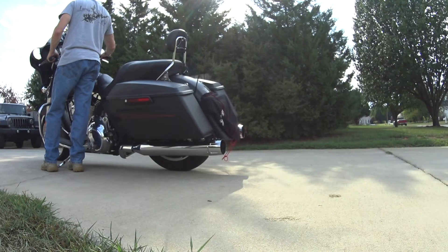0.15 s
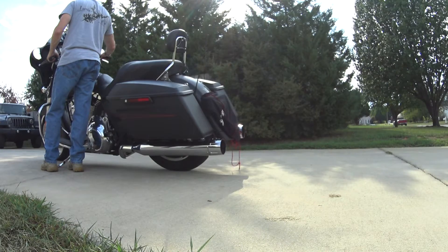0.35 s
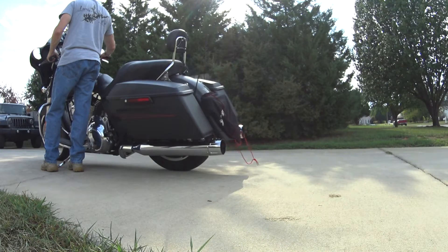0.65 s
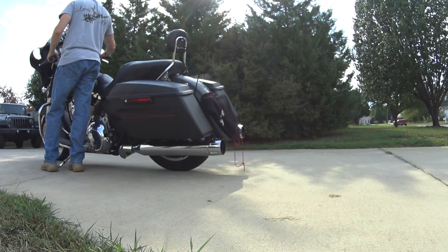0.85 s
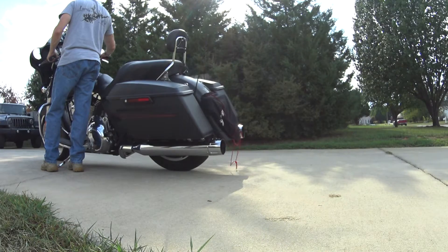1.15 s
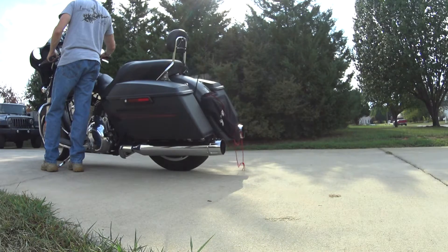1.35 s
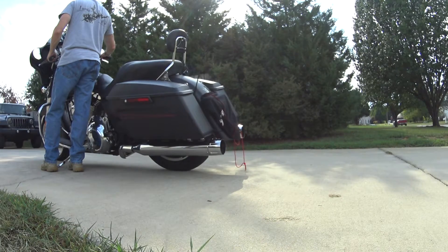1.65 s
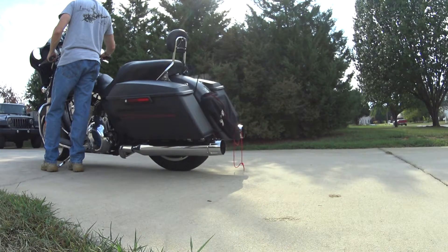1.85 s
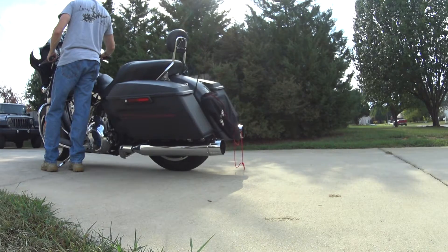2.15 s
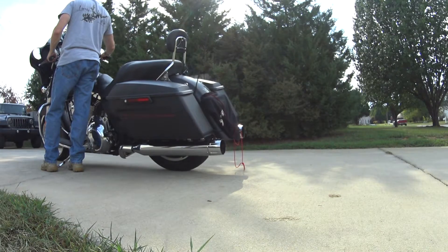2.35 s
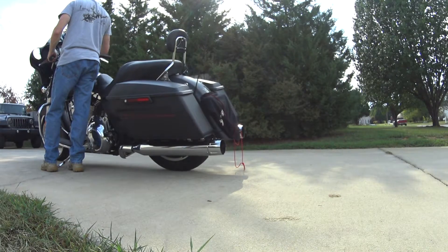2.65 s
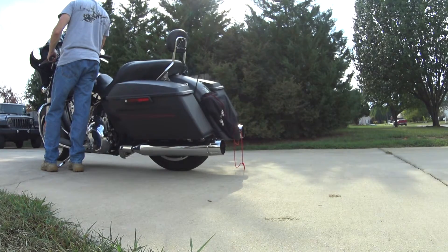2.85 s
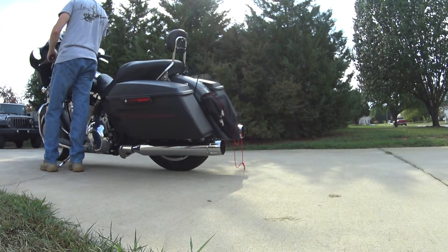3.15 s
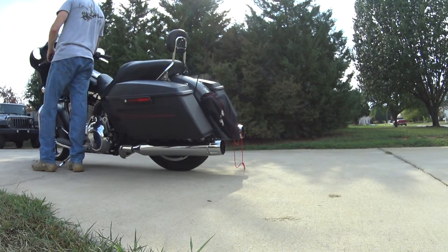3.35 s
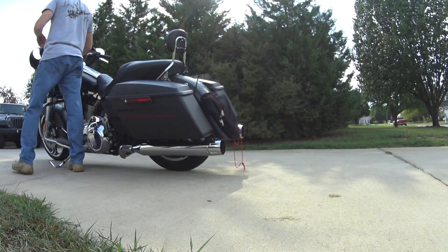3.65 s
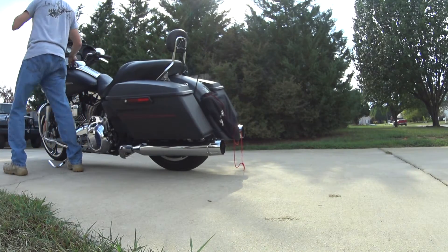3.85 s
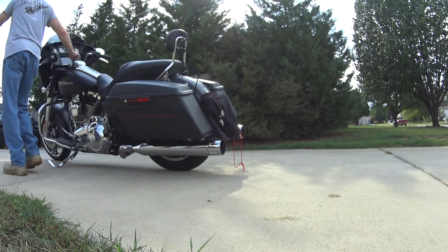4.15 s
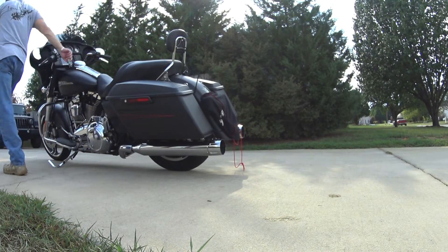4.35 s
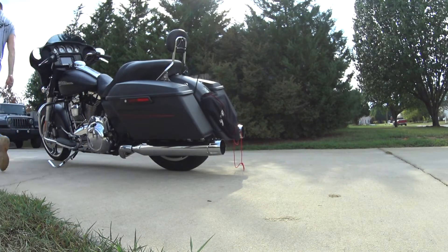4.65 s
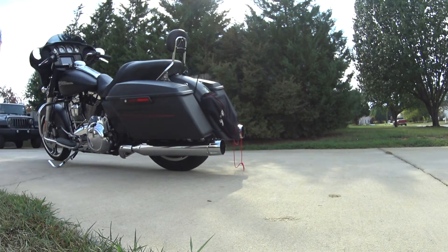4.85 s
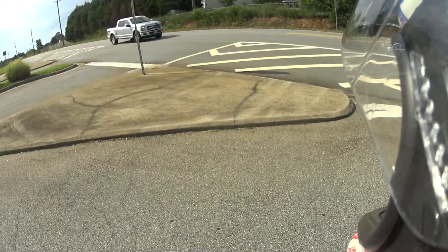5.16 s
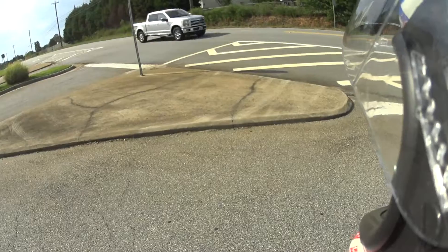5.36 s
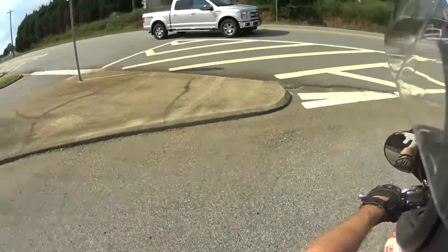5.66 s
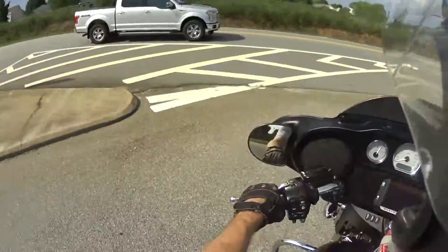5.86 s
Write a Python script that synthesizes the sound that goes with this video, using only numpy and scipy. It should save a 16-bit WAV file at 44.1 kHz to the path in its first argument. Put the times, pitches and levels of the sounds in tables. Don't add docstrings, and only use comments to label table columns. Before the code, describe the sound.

Uneven, loping motorcycle idle with clattering metal stops; faint scuffs and thuds follow in a hushed yard before a cut to close, heavy riding engine thump.

```python
import sys
import numpy as np
from scipy import signal
from scipy.fft import rfft, irfft
from scipy.io import wavfile
from scipy.ndimage import uniform_filter1d

SR = 44100
rng = np.random.default_rng(int(sys.argv[2]) if len(sys.argv) > 2 else 0)


def pcm_store(signal):
    levels = np.round(np.clip(np.atleast_2d(signal), -1, 1) * 32767)
    wavfile.write(sys.argv[1], SR, levels.astype(np.int16).T)


def to_linear_factor(level_db):
    exponent = np.asarray(level_db, float) / 20
    return 10 ** exponent


N = 265482
BRIEF_T = np.arange(4400) / SR
CUT_S, BACK_S = 5.315, 5.3575
KEY_OFF_S = 3.66
REAR_LAG = 315 / 720
FULL_DB, LEAN_DB = -10, -21.5


def evened(x):
    return x / np.sqrt(np.mean(x ** 2) + 1e-20)


def read(points, hz, column=1):
    table = np.transpose(points)
    return np.interp(np.log(hz + 1), np.log(table[0] + 1), table[column])


def add(mix, s, sound):
    part = mix[round(s * SR):][:len(sound)]
    part += sound[:len(part)]


def smooth_noise(size):
    return evened(uniform_filter1d(rng.standard_normal(N), size=size))


def noise(spectrum, span, size=512, patchy_db=4.0):
    hz = np.fft.rfftfreq(size, 1 / SR)
    length = round((span[1] - span[0]) * SR)
    real, imaginary, patches = rng.standard_normal((4 * length // size + 6, len(hz), 3)).T
    patches = uniform_filter1d(patches, size=size // 100, axis=0)
    patches = evened(uniform_filter1d(patches, size=4096 // size, axis=1))
    bins = (real + 1j * imaginary) * to_linear_factor(read(spectrum, hz)[:, None] + patchy_db * patches)
    wave = signal.istft(bins, nperseg=size, noverlap=3 * size // 4)[1]
    out = np.zeros(N)
    add(out, span[0], evened(wave[:length]))
    return out


def mode(hz, db, t60):
    return to_linear_factor(db - 60 * BRIEF_T / t60) * np.sin(2 * np.pi * hz * BRIEF_T)


def ports(shared, twin, table):
    hz = np.fft.rfftfreq(N, 1 / SR)
    tilt = to_linear_factor(read(table, hz) / 2) * np.exp(.5j * read(table, hz, column=2))
    like = np.clip(read(table, hz, column=3), 0, 1)
    left, other = rfft(shared), rfft(twin)
    right = like * left + np.sqrt(1 - like ** 2) * other
    return np.array([irfft(left * tilt, N), irfft(right / tilt, N)])


# frequency_hz, level_db
YARD_SPECTRUM = [(25, -26), (60, -14), (125, 1), (190, -7), (350, -10.5), (520, -11.5), (750, -19),
                 (1150, -16), (1900, -21), (2800, -22), (8600, -28.5), (11200, -26.5), (14000, -55)]
# frequency_hz, left_minus_right_db, left_lead_rad, likeness
YARD_PORTS = [(70, -5.5, .02, .96), (150, -2.5, -0.42, 1), (330, -1.5, -0.76, 0.83), (900, -1, -0.51, 0.19),
              (5500, -1, 0.12, 0.95), (9000, 2.1, -0.36, 0.6)]


def yard(steps):
    span, level = (0, BACK_S), to_linear_factor(-59.5)
    near = level * noise(YARD_SPECTRUM, span, size=2048, patchy_db=1.1)
    far = level * noise(YARD_SPECTRUM, span, size=2048, patchy_db=-1.0)
    return ports(near + steps, far + np.roll(steps, 6), YARD_PORTS)


def strokes(charges, law, snap_db=0):
    knock_db, knock_slope, jet_db, jet_slope, least_db, heat, cooling = law
    s, charge_db = np.transpose(charges)
    jet = np.maximum(jet_db + jet_slope * (charge_db - FULL_DB), least_db) + snap_db
    knock = knock_db + knock_slope * (charge_db - FULL_DB) + snap_db
    warmth = heat - cooling * np.maximum(LEAN_DB - charge_db, 0)
    return np.transpose([s, charge_db, knock, jet, warmth])


def rear_times(front_s, end_s):
    return front_s + REAR_LAG * np.diff(np.append(front_s, end_s))


def ring(pipe, heat):
    (open_hz, shut_hz, middle_s, rise_s, shut_s), orders = pipe
    t = BRIEF_T
    rise = .5 + .5 * np.tanh((t - middle_s) / rise_s)
    hz = heat * (open_hz + (shut_hz - open_hz) * rise)
    turn = 2 * np.pi * np.cumsum(hz) / SR + np.pi
    wave = 0
    for order, (first_db, last_db) in enumerate(orders, 1):
        wave = wave + to_linear_factor(first_db + (last_db - first_db) * t / shut_s) * np.cos(order * turn)
    return wave * np.clip(t / .005, 0, 1) * to_linear_factor(-1300 * np.maximum(t - shut_s, 0))


def exhaust(cylinders, muffler, knock_db, jet_db, chuff_s):
    pipes, jet, chuff = np.zeros(N), np.zeros(N), np.zeros(N)
    t = BRIEF_T
    knock = np.exp(-((t - .0006) / 0.00026) ** 2) - 0.2 * np.exp(-((t - .0014) / 0.00048) ** 2)
    spit = np.exp(-((t - .0045) / 0.003) ** 2) + 0.43 * (t > .005) * np.exp(-t / 0.019)
    swell = t / chuff_s * np.exp(1 - t / chuff_s)
    for events, pipe in cylinders:
        for s, ring_db, valve_db, crack_db, heat in events:
            shell = sum(mode(hz * rng.uniform(0.87, 1.04), db + 2 * rng.normal(), t60) for hz, db, t60 in muffler)
            add(pipes, s, to_linear_factor(ring_db) * ring(pipe, heat))
            add(pipes, s - .0006, to_linear_factor(valve_db + knock_db) * (knock + shell))
            add(jet, s, to_linear_factor(crack_db + jet_db) * spit)
            add(chuff, s, to_linear_factor(ring_db) * swell)
    return pipes, jet, chuff


# pitch_hz, level_db, t60_s
FIN_MODES = [(4350, -5, .015), (4830, -4, .02), (5320, -3.5, .02), (5700, -2, .02), (6610, -5, .015),
             (8350, -9, .012)]


def fins(shake, ticks_per_s):
    which = rng.integers(0, len(FIN_MODES), N)
    ticks = to_linear_factor(1.3 * np.minimum(rng.exponential(1, N), 4)) * (rng.random(N) < ticks_per_s / SR)
    struck = np.zeros(N)
    for k, fin in enumerate(FIN_MODES):
        struck += signal.oaconvolve(shake * ticks * (which == k), mode(*fin))[:N]
    return evened(struck)


# frequency_hz, level_db
JET_SPECTRUM = [(700, -9.5), (1600, 9), (2700, -8), (4500, 1.5), (5500, 2), (7200, -3), (8600, -4),
                (11000, -5)]
# frequency_hz, level_db
BOOM_SPECTRUM = [(30, -38), (55, 2.5), (90, -3), (150, -5), (210, -10.5), (280, -40), (400, -51)]


def engine(cylinders, muffler, body, layers, rumble, clatter, mics,
           knock_db, jet_db, pump, chuff_s, fins_db, lumpy_db, patchy_db):
    pipes, jet, pumping = exhaust(cylinders, muffler, knock_db, jet_db, chuff_s)
    s, shake_db = np.transpose(body)
    span, t = (s[0], s[-1]), np.arange(N) / SR
    boom, low, high = (to_linear_factor(np.interp(t, s, db + slope * shake_db, -120, -120)) for db, slope in layers)
    boom = boom / (1 + 12 * uniform_filter1d(abs(pipes), size=600))
    if s[0] < KEY_OFF_S:
        boom = boom * to_linear_factor(-55 * np.clip(t - KEY_OFF_S, 0, 1))
    low = low * (1 + pump * pumping) * to_linear_factor(lumpy_db * smooth_noise(700))
    jet = jet * to_linear_factor(2.1 * smooth_noise(50))
    shake = high + .1 * jet
    metal = to_linear_factor(fins_db) * fins(shake, 1500) * np.sqrt(np.mean(shake ** 2))

    def turbulence():
        rumbling = low * noise(rumble, span, size=1024, patchy_db=patchy_db)
        clattering = high * noise(clatter, span)
        return rumbling + clattering + jet * noise(JET_SPECTRUM, span, patchy_db=1.3)

    near, far = turbulence(), turbulence()
    direct = pipes + metal + boom * noise(BOOM_SPECTRUM, span, size=2048, patchy_db=3.5)
    return ports(direct + near, np.roll(direct, 260) + far, mics)


# front_start_s, front_charge_db, rear_charge_db, snap_db; lean charges misfire
IDLE = [(0.1038, -27.5, -21.5, -8), (0.2088, -13.5, -12.5, .5), (0.3226, -31, -31, 3),
        (.4197, -10.5, -32.5, -2), (.533, -53, -12.5, 5.5), (.649, -10, -23.5, -1.5),
        (0.7609, -12, -18.5, -0.5), (0.8765, -11.5, -14.5, -1), (0.9893, -16.5, -45, -0.5),
        (1.1098, -12, -11.5, 0.5), (1.2246, -9.5, -47, -0.5), (1.3382, -16.5, -16, 0.5),
        (1.4634, -10.5, -19, 1.5), (1.5835, -11.5, -17, -2), (1.7042, -10, -21.5, 2),
        (1.825, -11, -13.5, 4.5), (1.9405, -8.5, -25.5, -1.5), (2.0561, -10, -15.5, 0),
        (2.1759, -9.5, -14, 2.5), (2.2934, -9, -25.5, 1), (2.4135, -9.5, -11, 2), (2.5296, -8, -40.5, 0),
        (2.6456, -10.5, -13, -3), (2.7678, -9.5, -15.5, 0), (2.8856, -8.5, -12.5, -1),
        (3.0034, -9, -23, -1), (3.1234, -10, -10.5, 2.5), (3.2422, -9, -17, -2), (3.3603, -9, -10, 2),
        (3.4761, -9.5, -18, 0.5)]
# start_s, charge_db
IDLE_FIRST_REAR = (0.027, -19)
# start_s, charge_db
RUNDOWN = [
    (3.605, -15),
    (3.666, -19),
    (3.7085, -31),
    (3.7587, -18.5),
    (3.8437, -22.5),
    (3.903, -35),
    (4.002, -22.5),
    (4.333, -44.5),
]
# knock_at_full_db, knock_db_per_db, jet_at_full_db, jet_db_per_db, least_jet_db,
# heat_factor, heat_lost_per_lean_db
FRONT_LAW = (-22.5, 1.4, -29.5, 1.5, -50, 0.99, 0.04)
REAR_LAW = (-25.5, 0.2, -28.5, 1.6, -51.5, 0.97, -0.05)
COLD_LAW = (-21.5, 1, -27, 1.4, -70, 1.32, 0.2)
# opening_db, closing_db
FRONT_PIPE = (57.7, 72.2, 0.015, 0.0043, 0.04), [(-20, -20), (0.55, -3.5), (-25, -33.5), (-23.5, -25)]
REAR_PIPE = (59, 98.1, 0.025, 0.0068, 0.046), [(-19.5, -15), (0.2, -5.5), (-13.5, -18), (-22, -22)]
COLD_PIPE = (59.7, 63.3, 0.018, .005, 0.043), [(1, -22), (3, -24), (-25, -25), (-31, -31)]


def idling():
    s, front_db, rear_db, snap_db = np.transpose(IDLE)
    front = strokes([*zip(s, front_db)], FRONT_LAW, snap_db)
    rear_charges = [IDLE_FIRST_REAR, *zip(rear_times(s, RUNDOWN[0][0]), rear_db)]
    rear = strokes(rear_charges, REAR_LAW, 0.53 * np.append(0, snap_db))
    return [(front, FRONT_PIPE), (rear, REAR_PIPE), (strokes(RUNDOWN, COLD_LAW), COLD_PIPE)]


# pitch_hz, level_db, t60_s
MUFFLER = [(390, -15, 0.036), (716, -16.5, 0.047), (786, -13.5, 0.011), (1147, -17.5, 0.075),
           (1600, -29, 0.022)]
# time_s, level_db
BODY = [(0, -1.5), (.17, -2.5), (.3, -4.5), (1.0, -3.5), (1.2, -3), (1.75, -2.5), (1.95, -1.5), (2.65, 0),
        (3.1, -0.5), (3.45, 1), (3.61, -1.5), (3.89, -4.5), (4.02, -6), (4.11, -11), (4.2, -18.5),
        (4.42, -23.5), (4.6, -39)]
# level_at_zero_shake_db, db_per_db_of_shake
BODY_LAYERS = [
    (-23.5, 1.6),
    (-32, 1.05),
    (-38.5, 1.33),
]
# frequency_hz, level_db
RUMBLE = [(140, -26), (230, 5), (317, -10), (377, 0.5), (612, -6), (766, -8), (1520, -18), (2100, -22),
          (2690, -28.5), (3000, -35), (3900, -42), (6600, -120)]
CLATTER = [(880, 16), (1500, -15), (2100, 2), (2700, 2.5), (3170, 6.5), (4630, -1), (5670, 5), (10200, 1),
           (11200, -12), (14600, -49), (22000, -120)]
# frequency_hz, left_minus_right_db, left_lead_rad, likeness
DRIVE_PORTS = [(60, -4.7, -1.06, 1), (152, -6, -0.67, 1), (340, -6.5, -1.15, 0.99), (900, -4, -0.88, 0.99),
               (2500, -1, -0.38, 0.77), (5500, -0.6, -0.36, 0.91), (9000, 1.1, 0.18, 0.83)]


def parked_engine():
    return engine(idling(), MUFFLER, BODY, BODY_LAYERS, RUMBLE, CLATTER, DRIVE_PORTS,
                  knock_db=9.5, jet_db=2.0, pump=3.46, chuff_s=0.012, fins_db=-9.5, lumpy_db=1.62, patchy_db=2.0)


# start_s, level_db, pitch_hz
PINGS = [(.588, -25, 5440), (1.163, -20, 5320), (1.17, -25, 5550), (2.233, -28.5, 5370), (2.47, -47, 5330),
         (3.178, -21.5, 5410), (3.187, -23, 5570), (3.416, -32, 5260), (.16, -29, 8740)]


def cylinder_pings():
    out, soft = np.zeros(N), np.minimum(np.arange(4400) / 120, 1)
    for s, db, hz in PINGS:
        add(out, s, to_linear_factor(db) * soft * (mode(hz, 0, .035) + mode(hz * 1.05, -8, .02)))
    return out


# start_s, level_db, centre_hz, length_s
SCUFFS = [(3.734, -42, 4470, 0.034), (3.807, -34, 1190, 0.029), (3.884, -39, 1520, 0.048),
          (3.946, -36.5, 3450, 0.028), (3.985, -35.5, 3860, 0.028), (4.049, -39, 990, 0.047),
          (4.14, -41.5, 3120, 0.023), (3.651, -45, 2780, 0.053), (3.833, -42, 2800, .08),
          (4.016, -43, 3370, 0.03), (4.186, -49.5, 2500, 0.056), (4.278, -51, 6600, 0.011),
          (4.621, -59.5, 5040, .012), (4.678, -57, 2040, 0.032), (4.703, -55.5, 4500, 0.078),
          (4.952, -60.5, 4500, 0.033), (4.98, -59, 900, 0.017), (5.20, -58, 3500, 0.011),
          (5.217, -60, 6000, 0.0098), (5.257, -54, 3500, 0.021), (5.28, -51, 2300, 0.029)]


def scuffs():
    out = np.zeros(N)
    for s, db, hz, length in SCUFFS:
        n = round(length * SR) + 400
        clumps = to_linear_factor(2.4 * rng.standard_normal(100).repeat(40)[:n])
        grit = rng.standard_normal(4000)[:n] * clumps
        band = signal.butter(2, [hz * .5, min(hz * 1.7, 11e3)], "band", fs=SR)
        envelope = np.minimum(np.arange(n) / 90, 1) * np.linspace(1, 0, n)
        add(out, s, to_linear_factor(db) * evened(signal.lfilter(*band, grit)) * envelope)
    return out


# start_s, level_db,
# low_mode_hz, high_mode_hz, high_mode_db
THUDS = [(4.218, -41, 155, 400, -3), (4.262, -51, 130, 590, 11), (4.335, -35, 155, 430, -4),
         (4.487, -53, 150, 400, 8), (4.062, -38, 330, 620, 1), (4.948, -62, 200, 500, 2),
         (3.80, -40, 380, 1170, 2), (3.905, -42, 520, 1160, 2), (3.965, -44, 600, 1200, 3),
         (4.005, -36, 320, 800, -3), (4.68, -75, 300, 1850, 14), (4.703, -75, 300, 2050, 16),
         (5.283, -72, 300, 2300, 16)]


def thuds_and_rings():
    out, soft = np.zeros(N), np.minimum(np.arange(4400) / 120, 1)
    for s, db, low_hz, high_hz, high_db in THUDS:
        add(out, s, to_linear_factor(db) * soft * (mode(low_hz, 0, 0.15) + mode(high_hz, high_db, 0.13)))
    return out


# front_start_s, gas_heat_factor on the pipe note
RIDE = [(5.3932, 0.94), (5.4911, 0.95), (5.5842, 0.94), (5.6761, 0.96), (5.7719, .915), (5.8687, 0.91),
        (5.9659, 1)]
# start_s, charge_db
RIDE_FIRST_REAR = (5.342, -7.5)
RIDE_FRONT_LAW = (-15.5, 0, -48.5, 0, -70, 1.0, 0)
RIDE_REAR_LAW = (-25, 0.5, -55, 0.5, -70, 1.0, 0)
RIDE_FRONT_PIPE = (60, 83.5, 0.0159, .0025, 0.043), [(-2.5, -19.5), (0, -16), (-14.5, -42), (-23, -49)]
RIDE_REAR_PIPE = (63.8, 100, 0.0203, 0.0025, 0.051), [(-0.5, -19.5), (-7, -14.5), (-7.5, -47.5), (-24, -57)]


def rolling():
    front_db, rear_db, end_s = 1.37, -1.1, 6.062
    s, heat = np.transpose(RIDE)
    front = strokes([(at, front_db) for at in s], RIDE_FRONT_LAW)
    rear_charges = [RIDE_FIRST_REAR] + [(at, rear_db) for at in rear_times(s, end_s)]
    rear = strokes(rear_charges, RIDE_REAR_LAW)
    front[:, -1] *= heat
    rear[1:, -1] *= heat
    return [(front, RIDE_FRONT_PIPE), (rear, RIDE_REAR_PIPE)]


# pitch_hz, level_db, t60_s
RIDE_MUFFLER = [(273, -14, 0.18), (400, -5, 0.048), (701, -14, 0.22), (796, -11.5, 0.24), (1148, -9, 0.076)]
# time_s, level_db
RIDE_BODY = [(5.35, 0.4), (6.03, -0.31)]
# level_at_zero_shake_db, db_per_db_of_shake
RIDE_LAYERS = [
    (-32, 3.0),
    (-29.5, .1),
    (-51.5, 1.1),
]
# frequency_hz, level_db
RIDE_RUMBLE = [(160, -40), (280, 3.5), (322, -8.5), (416, -5), (513, -18), (561, -10), (712, -9), (851, -8),
               (958, -17), (3000, -40), (3900, -73), (6600, -120)]
RIDE_CLATTER = [(1180, -24), (2000, -5.5), (4610, -14.5), (5530, -11.5), (6860, -17), (8100, -8.5),
                (9420, -21), (10300, -13), (11200, -23), (14600, -56), (22000, -120)]
# frequency_hz, left_minus_right_db, left_lead_rad, likeness
HELMET_PORTS = [(70, 0.9, -0.23, 1), (150, 2, -0.067, 0.99), (330, 3.5, -0.11, 0.97), (900, 1, -.07, 0.89),
                (2500, 4, -.03, 0.11), (9000, -1.5, -.03, 0.17)]


def ridden_engine():
    return engine(rolling(), RIDE_MUFFLER, RIDE_BODY, RIDE_LAYERS, RIDE_RUMBLE, RIDE_CLATTER, HELMET_PORTS,
                  knock_db=-9.0, jet_db=2.0, pump=1.0, chuff_s=0.0028, fins_db=-21, lumpy_db=0.4, patchy_db=1.1)


def scene():
    t = np.arange(N) / SR
    drive = yard(cylinder_pings() + scuffs() + thuds_and_rings()) + parked_engine()
    drive_gain = np.clip((CUT_S - t) / .004, to_linear_factor(-29), 1) * (t < BACK_S)
    ride_gain = np.clip((t - BACK_S) / 0.013, 0, 1)
    return drive * drive_gain + ridden_engine() * ride_gain


def band_limit(x):
    return signal.sosfilt(signal.butter(12, 15780, fs=SR, output="sos"), x)


def record(dry):
    low_pass = signal.firwin(401, 11050, window=("kaiser", 8), fs=SR)
    narrow = signal.oaconvolve(dry, low_pass[None], "same")
    narrow = signal.filtfilt(*signal.butter(1, 16, "high", fs=SR), narrow)
    return band_limit(np.clip(narrow, -1, 1))


dry = scene()
out = record(dry)
pcm_store(out)
```